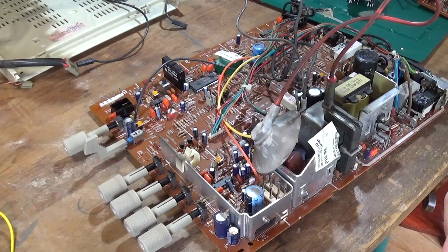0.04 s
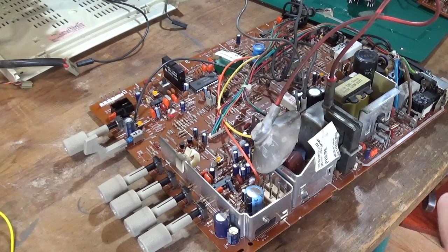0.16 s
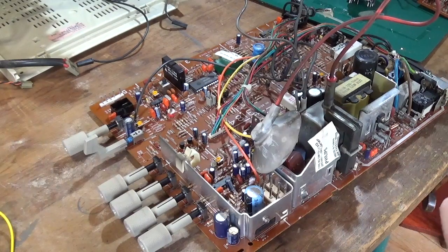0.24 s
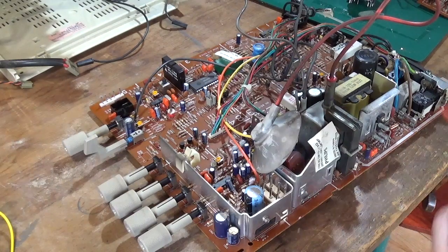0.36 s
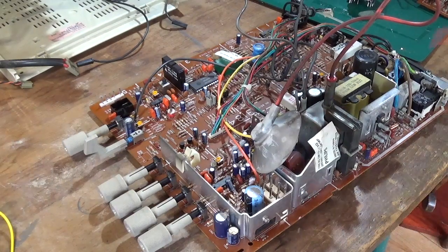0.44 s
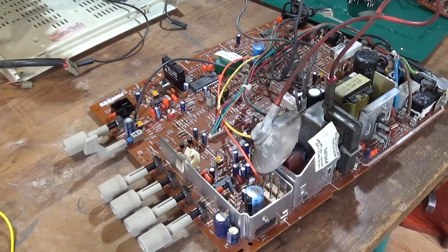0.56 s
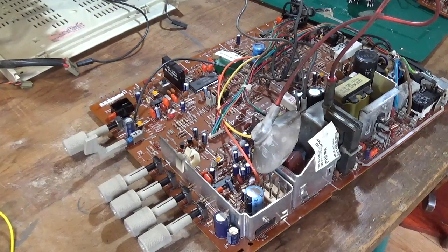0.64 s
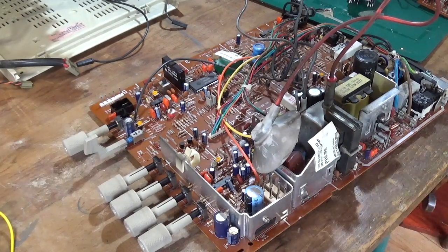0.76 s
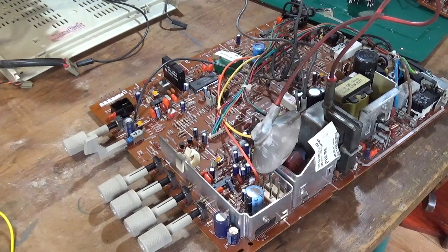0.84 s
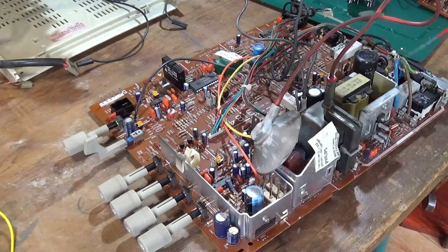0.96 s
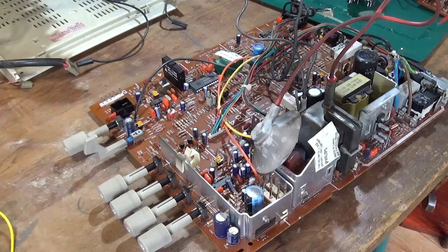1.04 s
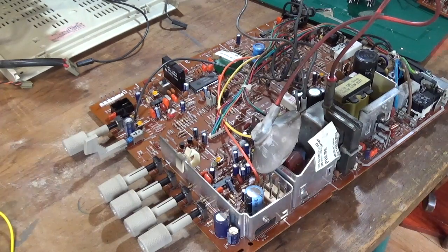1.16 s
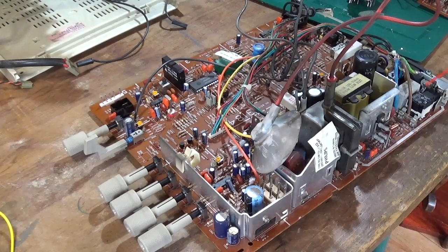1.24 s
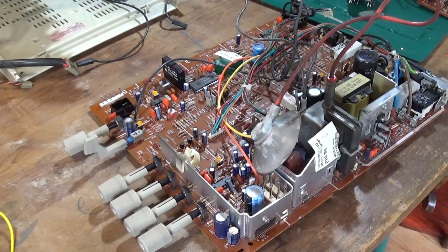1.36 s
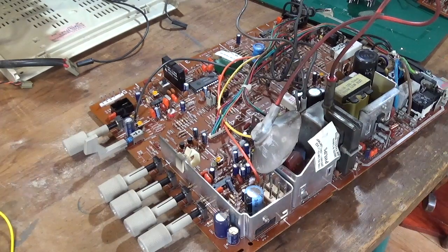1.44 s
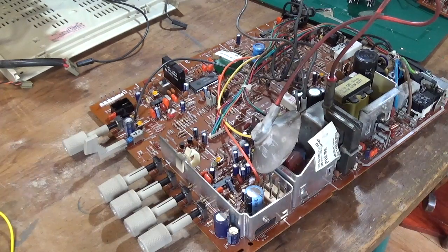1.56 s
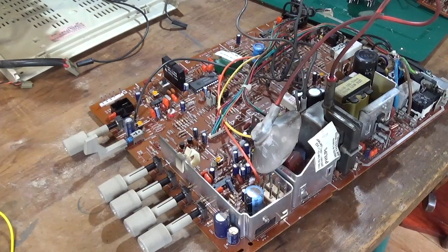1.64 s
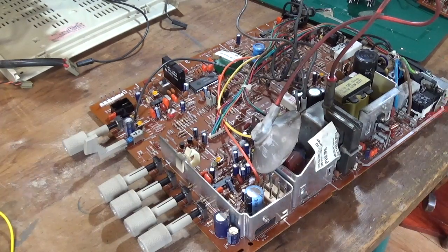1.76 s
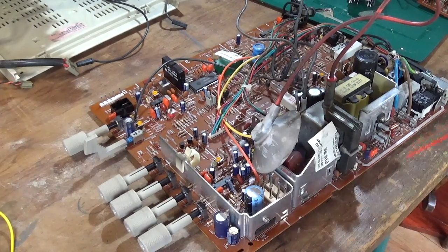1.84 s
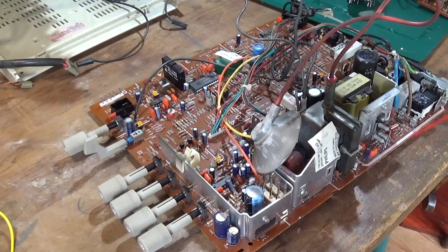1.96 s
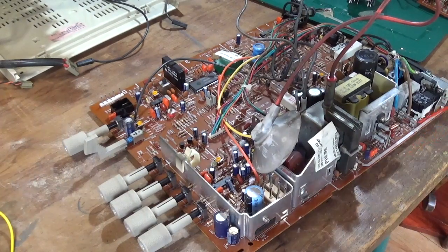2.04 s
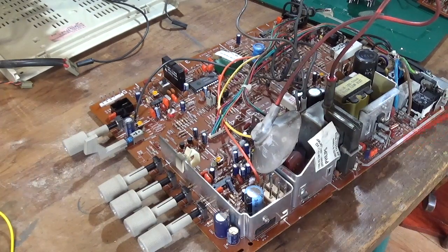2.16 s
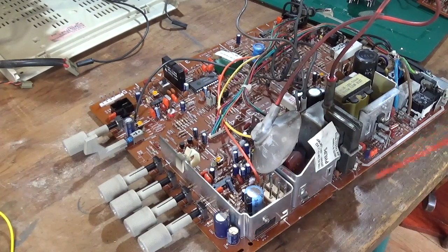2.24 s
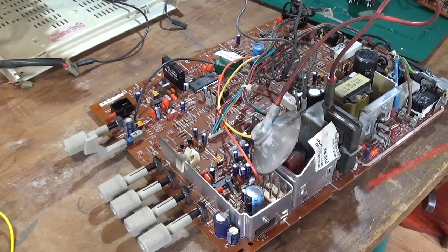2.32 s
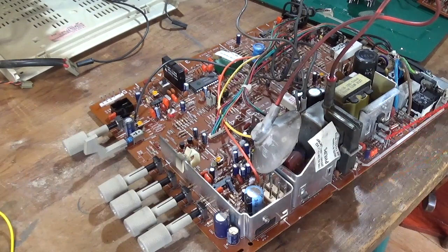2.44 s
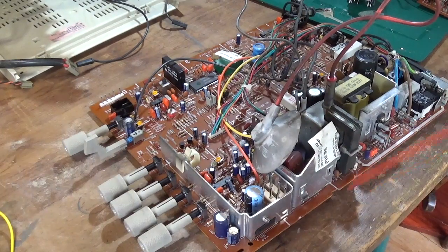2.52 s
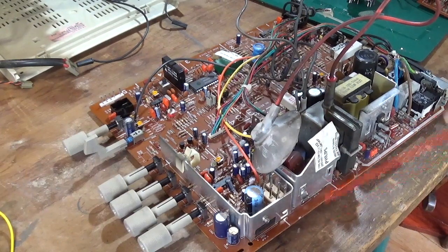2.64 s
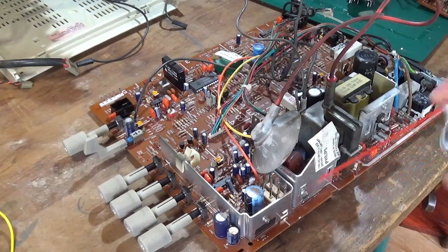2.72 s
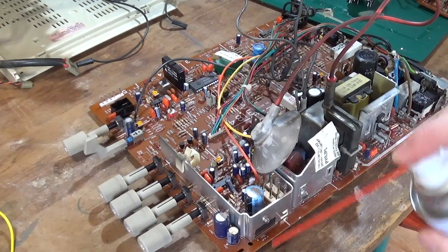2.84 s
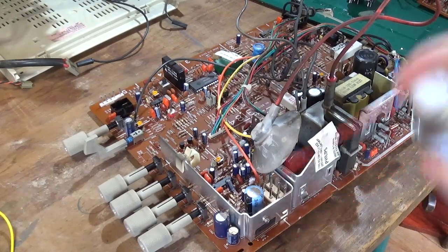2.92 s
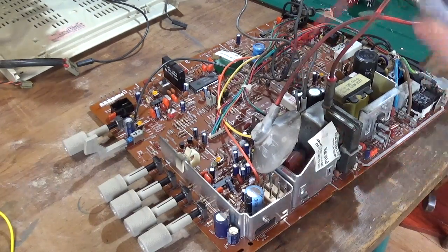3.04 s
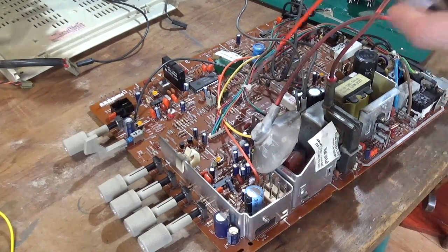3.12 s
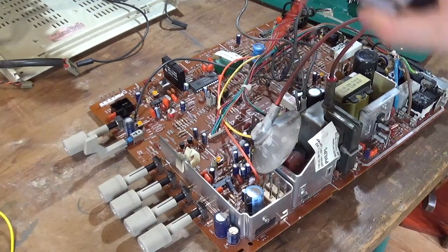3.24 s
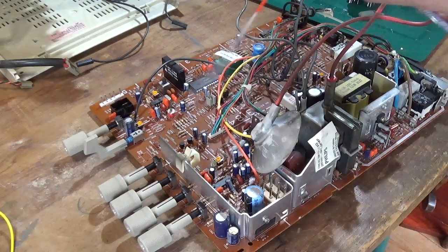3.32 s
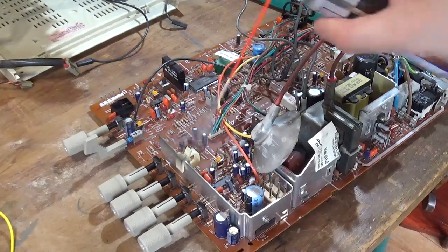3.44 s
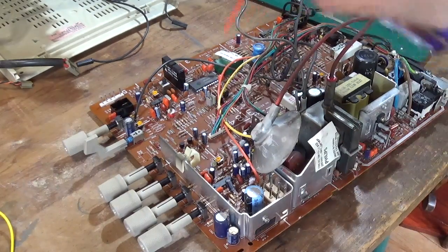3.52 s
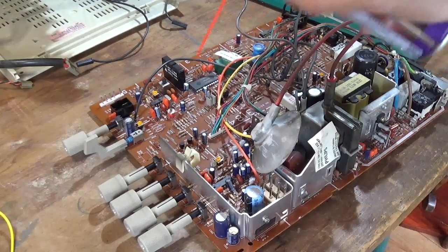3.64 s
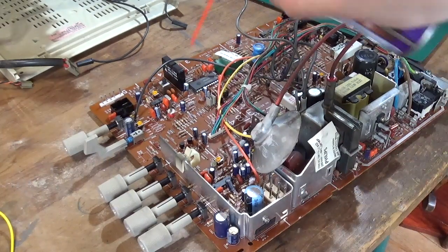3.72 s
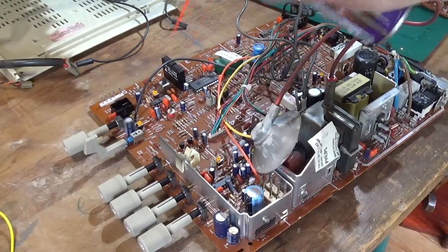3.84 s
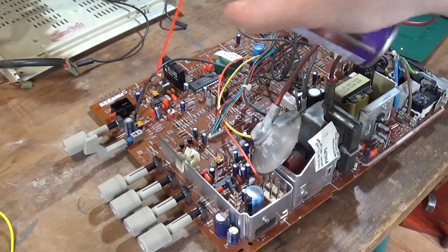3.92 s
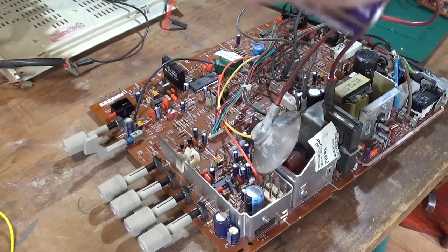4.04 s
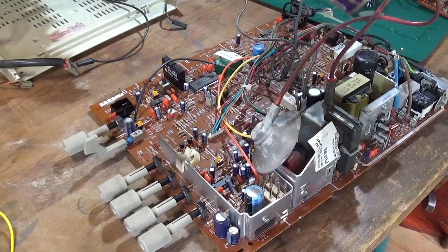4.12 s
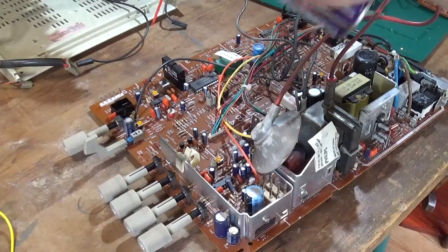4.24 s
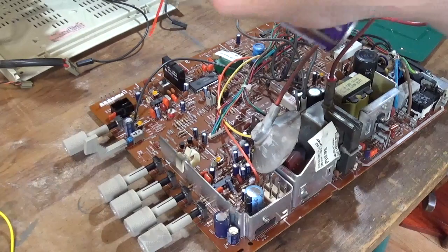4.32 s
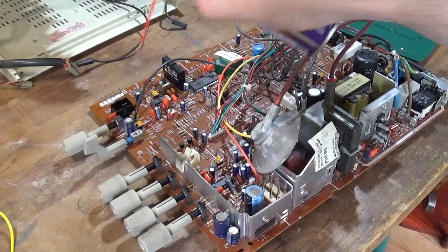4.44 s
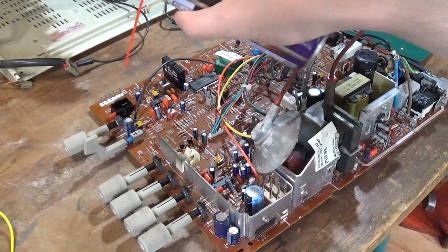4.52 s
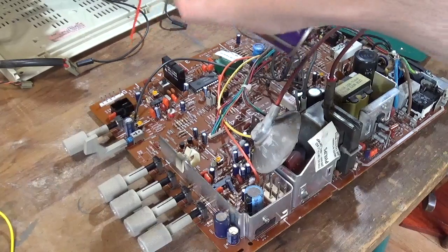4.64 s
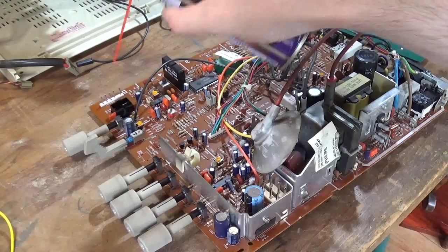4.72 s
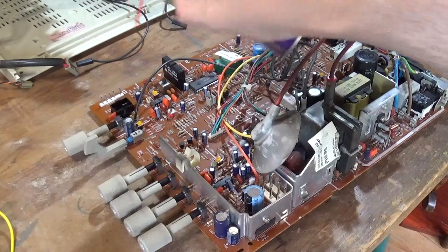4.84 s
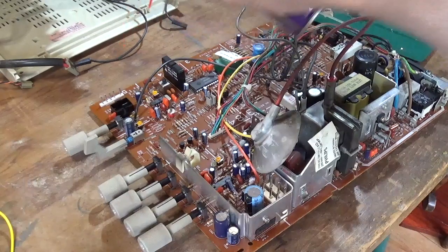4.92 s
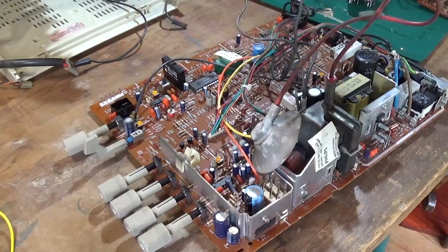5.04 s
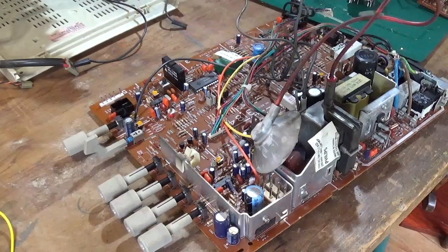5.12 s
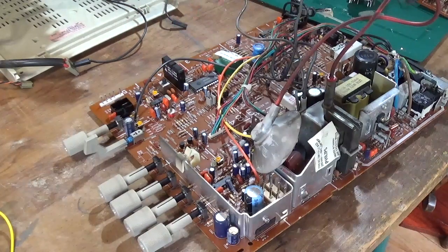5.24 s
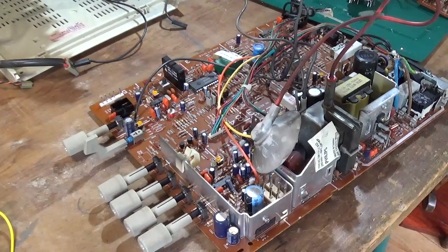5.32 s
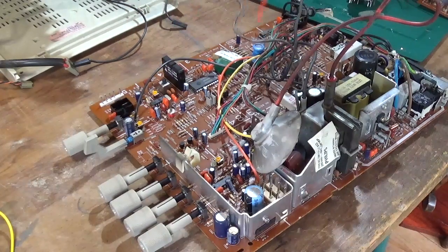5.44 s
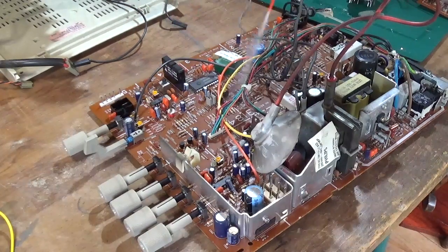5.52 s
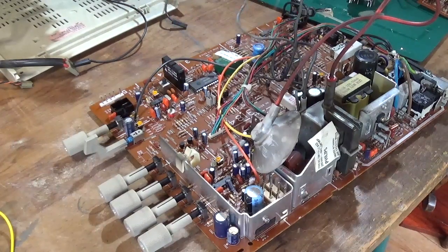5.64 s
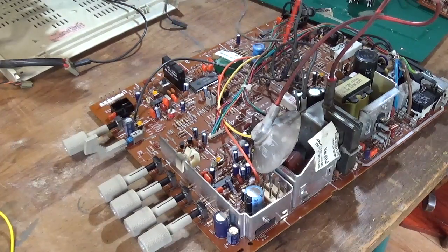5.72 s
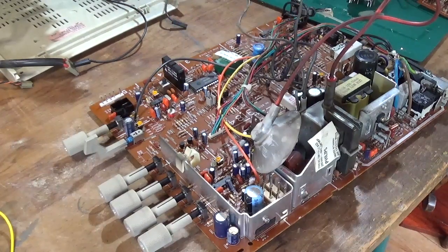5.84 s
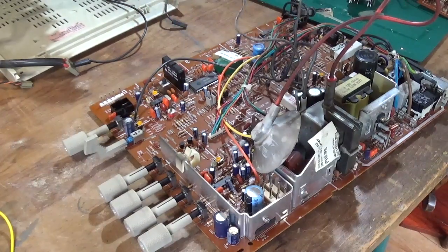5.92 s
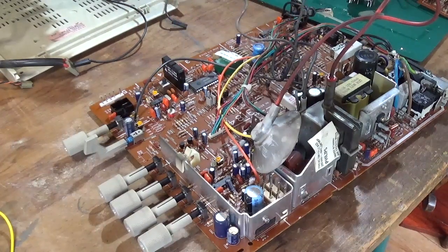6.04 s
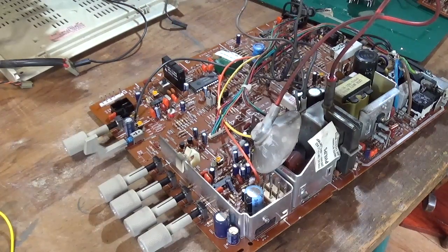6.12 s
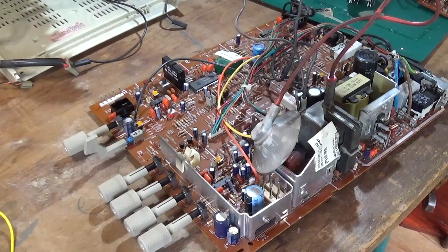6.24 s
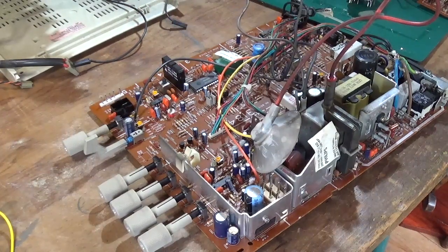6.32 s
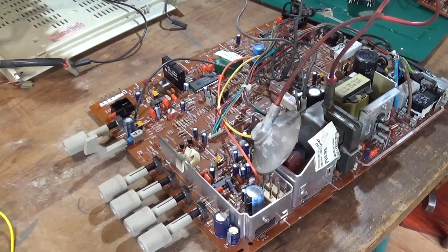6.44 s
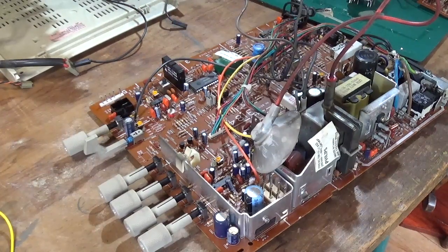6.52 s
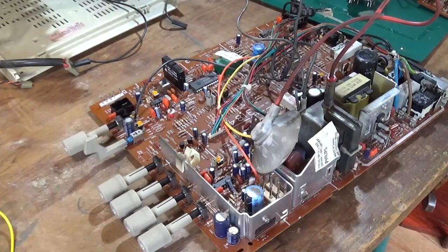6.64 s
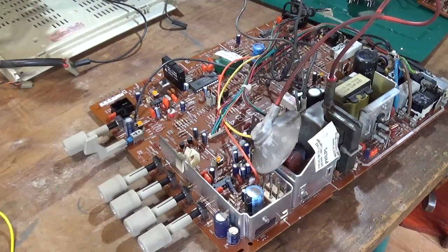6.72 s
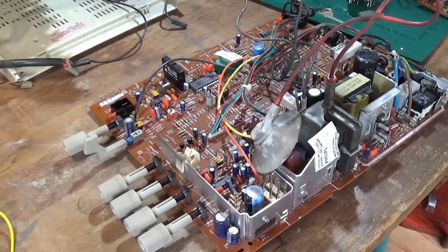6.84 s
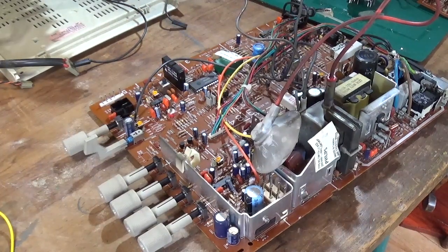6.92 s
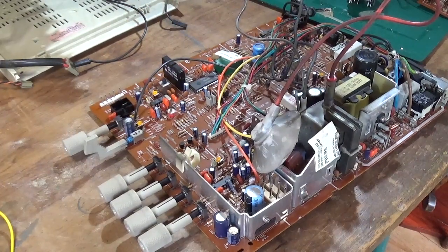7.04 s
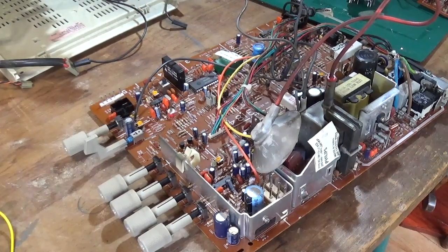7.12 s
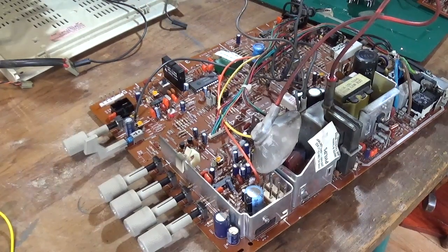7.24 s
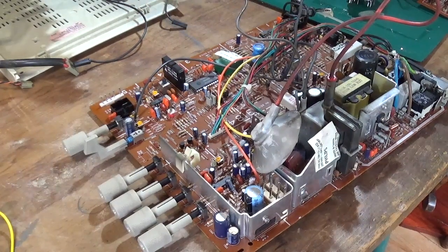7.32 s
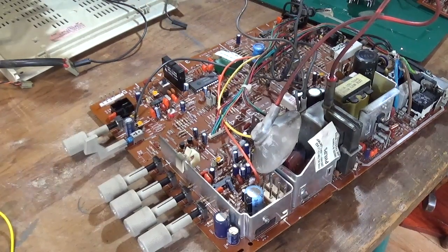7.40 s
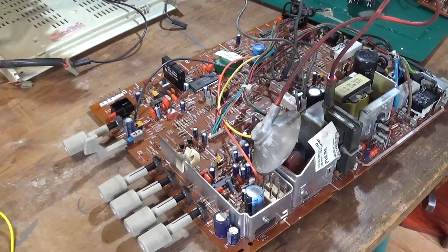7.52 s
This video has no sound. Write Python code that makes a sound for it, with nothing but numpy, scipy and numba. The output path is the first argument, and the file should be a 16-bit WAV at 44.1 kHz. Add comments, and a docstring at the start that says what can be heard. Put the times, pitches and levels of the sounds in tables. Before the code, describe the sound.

Close compressed-air spray hisses and roars over crowded electronic parts in six bursts, followed by sleeve rustle, dull taps and one last brief puff.

```python
"""A quiet room hums throughout; plastic trigger ticks come first, and a few more in later pauses.
Six short bursts of compressed air hit a circuit board: the free jet is high noise, the struck parts add
a lower roar with gap resonances, and edges add swells. Then a sleeve rustles (banded noise in strokes) and
soft knocks land on the bench (decaying modes), with faint squeaks and thin hiss; a seventh, brief burst
runs to the end. All is heard close by in stereo; bench and walls add short noise tails."""
import sys
import numpy as np
from scipy import signal
from scipy.fft import rfft, irfft, next_fast_len
from scipy.io import wavfile
from scipy.ndimage import uniform_filter1d
from numba import njit

SR = 44100
rng = np.random.default_rng(int(sys.argv[2]) if len(sys.argv) > 2 else 0)


def to_wav(sig):
    """Store sig (one row per channel, or 1-D mono) as 16-bit WAV at the path in sys.argv[1].

    Samples outside -1..1 are clipped; the rate is SR.
    """
    pcm = np.clip(np.atleast_2d(sig), -1, 1) * 32767
    pcm = np.round(pcm).astype(np.int16)
    wavfile.write(sys.argv[1], SR, pcm.T)  # frames by channels


N = 333837
TIME = np.arange(N) / SR
FFT_SIZE = next_fast_len(N)
HZ = np.maximum(np.fft.rfftfreq(FFT_SIZE, 1 / SR), 1)

# Left-right correlation of the near noise. Each row: frequency in Hz, correlation.
NEAR_LIKENESS = [(60, 0.33), (300, 0.9), (900, 0.93), (1900, 0.83), (2700, 0.92), (3600, 0.58),
                 (5500, 0.13), (6800, 0.58), (7600, 1), (9200, 0.81), (10300, 0.59), (15000, 0.66)]


def undb(db):
    """dB to gain."""
    return 10 ** (np.asarray(db) / 20)


def unit(x):
    """Scale to rms 1."""
    return x / np.sqrt(np.mean(x ** 2))


def on_hz(points):
    """Read a table of (Hz, value) on a log-frequency axis."""
    hz, value = np.transpose(points)
    return np.interp(np.log(HZ), np.log(hz), value)


def noise(likeness, colour=((1, 0), (2, 0))):
    """Stereo noise, rms 1, with a colour and a left-right correlation for each frequency."""
    corr = np.clip(on_hz(likeness), 0, 1)
    white = rfft(rng.standard_normal((2, FFT_SIZE)))
    mid, side = white * np.sqrt([1 + corr, 1 - corr]) * undb(on_hz(colour))
    return unit(irfft([mid + side, mid - side], FFT_SIZE)[:, :N])


@njit
def svf(x, g, k):
    """State-variable band-pass on each channel; centre and width may move every sample."""
    y = np.empty(x.shape)
    for c in range(x.shape[0]):
        b, l = 0., 0.
        for i in range(x.shape[1]):
            v = (b + g[i] * (x[c, i] - l)) / (1 + g[i] * (g[i] + k[i]))
            b, l, y[c, i] = 2 * v - b, l + 2 * g[i] * v, k[i] * v
    return y


def band(x, hz, pass_width_hz):
    """Band-pass run twice, rms 1; the width is that of one pass."""
    hz = np.clip(hz + np.zeros(N), 20, .45 * SR)
    g, k = np.tan(np.pi * hz / SR), pass_width_hz / hz
    return unit(svf(svf(x, g, k), g, k))


def walk(rate_hz):
    """Random levels held 1 / rate_hz and slewed twice, rms 1."""
    hold = int(SR / rate_hz)
    steps = np.repeat(rng.standard_normal(N // hold + 1), hold)
    return unit(uniform_filter1d(uniform_filter1d(steps, hold), hold)[:N])


def swell(s, db, fall_s, rise=1):
    """Bell-shaped gain, down to 1/e after fall_s; rise is the rising share of that time."""
    return undb(db) * np.exp(-((TIME - s) / np.where(TIME < s, rise * fall_s, fall_s)) ** 2)


def patchy(x, db, patch_hz, patch_s):
    """Patches of the spectrum swell and fade at random, alike left and right."""
    frame, hop = 512, 256
    spec = signal.stft(x, nperseg=frame)[2]
    field = rng.standard_normal(spec.shape[1:])
    for axis, cells in enumerate((patch_hz * frame / SR, patch_s * SR / hop)):
        field = uniform_filter1d(field, max(int(cells), 1), axis=axis)
    return signal.istft(spec * undb(db * unit(field)), nperseg=frame)[1][:, :N]


def strike(modes, crack_db, size, rough=.18):
    """A blow: decaying modes (Hz, dB, t60 s), detuned and phase-wavering each time, plus a noise crack."""
    t = np.arange(size) / SR
    chance = rng.standard_normal((len(modes) + 1, size))
    crack_t60_s = 0.091
    out = undb(crack_db) * chance[-1] * np.exp(-t * np.log(1000) / crack_t60_s)
    for (hz, db, t60_s), draw in zip(modes, chance):
        waver = rough * np.cumsum(draw)
        tone = np.sin(2 * np.pi * hz * (1 + .02 * draw[0]) * t + waver)
        out += undb(db) * tone * np.exp(-t * np.log(1000) / t60_s)
    return out


# Left-right correlation of the room. Each row: frequency in Hz, correlation.
ROOM_LIKENESS = [(25, 0.94), (60, 0.12), (150, 0.046), (600, 0.43), (3000, 0.12), (15000, 0.22)]
# Room air colour. Each row: frequency in Hz, relative density in dB per Hz.
ROOM_COLOUR = [(15, -39.5), (25, -16.5), (122, -7), (215, -16.5), (410, -17.5), (900, -24), (1300, -30),
               (2200, -36), (5000, -40.5), (12500, -42.5), (15500, -68)]
# Steady hum lines. Each row: centre in Hz, one-pass width in Hz, mean level in dB.
HUM_LINES = [(55.7, 10, -71.5), (176.9, 16, -68)]
# Level bumps of the 110 Hz noise band, most of them chance wavering. Each row: peak time in seconds,
# gain in dB, fall to 1/e in seconds.
BUMPS_110_HZ = [(0.135, -61, 0.041), (0.874, -50.5, 0.076), (2.63, -51, 0.04), (2.84, -55.5, 0.042),
                (3.88, -57, 0.051), (4.442, -53.5, 0.13), (7.398, -57, 0.055)]


def room():
    """Steady coloured air with wavering narrow-band hum, both stronger on the left."""
    air_db, rest_110_hz_db = -61, -66.5
    air = noise(ROOM_LIKENESS, ROOM_COLOUR) * undb(air_db + 0.71 * walk(3.2))
    hum = sum(undb(db + 1.5 * walk(2.7)) * band(noise(ROOM_LIKENESS), hz, width)
              for hz, width, db in HUM_LINES)
    gain = undb(rest_110_hz_db + 1.4 * walk(8)) + sum(swell(*row) for row in BUMPS_110_HZ)
    hum = hum + gain * band(noise(ROOM_LIKENESS), 110.0, 25)
    return air * undb([[1.5], [-1.5]]) + hum * undb([[2.5], [-2.5]])


# Thin hiss in some pauses. Each row: peak time in seconds, mean gain in dB, fall to 1/e in seconds.
SEEPS = [(2.144, -75, .04), (2.922, -73, 0.13), (4.985, -72.5, 0.062), (6.263, -68, .03),
         (7.272, -63, 0.046), (7.38, -68, .06), (7.47, -67, .04)]


def seep(hiss):
    """Thin hiss near 5 kHz, swelling with a flickering level."""
    return sum(swell(*row) for row in SEEPS) * undb(2.5 * walk(40)) * hiss


# Faint squeaks. Each row: peak time in seconds, level in dB, fall to 1/e in seconds, centre in Hz.
SQUEAKS = [(4.081, -73.5, 0.087, 1307), (6.069, -75.5, .06, 1380), (6.225, -67, 0.032, 1384),
           (7.05, -66, .02, 1520), (6.83, -68, 0.038, 1590), (7.4, -72, .07, 1550)]


def squeak():
    """Thin tones: narrow noise bands under bell-shaped gains."""
    return sum(swell(s, db, fall_s) * band(noise(NEAR_LIKENESS), hz, 70)
               for s, db, fall_s, hz in SQUEAKS)


# Plastic modes of trigger and straw. Each row: nominal frequency in Hz, t60 in seconds.
PLASTIC = [(1150, 0.056), (1600, 0.07), (2150, 0.039), (2870, 0.08), (4150, 0.09), (5150, .05), (7000, .04)]
# Trigger and straw ticks. Each row: start in seconds, level in dB, mode favoured by the spot struck in Hz,
# broad crack against the ring in dB.
TICKS = [(0.3794, -65, 4110, -12), (0.3874, -69, 3020, -8), (0.455, -51.5, 1570, -8),
         (2.1001, -63, 4990, -15.5), (2.1294, -64, 5250, -8), (5.018, -53, 2870, -12.5),
         (6.025, -60, 1150, -7), (6.244, -56, 5600, -14), (6.2861, -57, 5200, -8)]


def ticks():
    """Plastic blows; modes weaken by 24 dB an octave away from the one favoured by the spot struck."""
    out = np.zeros(N + 6000)
    for s, db, aim_hz, crack_db in TICKS:
        modes = [(hz, -24 * abs(np.log2(hz / aim_hz)), t60_s) for hz, t60_s in PLASTIC]
        out[int(s * SR):][:6000] += undb(db) * strike(modes, crack_db, size=6000)
    return out[:N]


# Bench top modes. Each row: nominal frequency in Hz, level in dB before hardness, t60 in seconds.
BENCH = [(193.5, -2, .055), (490, -6, 0.037), (880, -9.5, 0.027), (1250, -23, .02)]
# Soft bench knocks. Each row: start in seconds, level in dB, hardness as lift of upper modes in dB an octave.
KNOCKS = [(6.441, -45.5, 1.5), (6.688, -49.5, 4), (7.112, -49.5, 5.5), (7.1767, -43, 0.5),
          (7.211, -46.5, 3.5), (7.229, -46, -1), (7.244, -46, 2), (7.36, -47, -5), (7.37, -47, -5),
          (7.404, -56, 0), (7.417, -53, -5), (7.426, -51, -4)]


def knocks():
    """Blows on the bench modes, tilted by hardness and dulled by a low-pass."""
    out = np.zeros(N + 6000)
    soft = signal.butter(2, 1300, fs=SR, output="sos")
    for s, db, hard_db in KNOCKS:
        modes = [(hz, mode_db + hard_db * np.log2(hz / BENCH[0][0]), t60_s) for hz, mode_db, t60_s in BENCH]
        blow = signal.sosfilt(soft, strike(modes, -19, size=6000, rough=0.04))
        out[int(s * SR):][:6000] += undb(db) * blow
    return out[:N]


SLEEVE_START_S, SLEEVE_STOP_S, SLEEVE_FADE_S, SLEEVE_DB = 5.85, 7.5, 0.48, -70
STROKE_RISE = 0.65  # share of the fall
# Sleeve strokes. Each row: peak time in seconds, treble gain in dB, fall to 1/e in seconds,
# part below 4 kHz against the treble in dB.
STROKES = [(6.147, -74, 0.022, -4), (6.25, -73, 0.024, -4), (6.33, -64.5, .03, -14),
           (6.397, -59.5, .04, -6), (6.44, -65, 0.027, 1), (6.533, -63, 0.038, -17),
           (6.645, -56.5, 0.038, -7), (6.76, -58.5, 0.043, -14), (6.827, -66, .02, -5),
           (6.857, -58.5, .03, -5), (6.92, -65, 0.039, -16), (6.974, -61.5, .03, -14),
           (7.064, -56, 0.041, -5), (7.168, -64, 0.052, -10), (7.29, -67, .04, -4), (7.488, -72, 0.033, 0)]


def sleeve():
    """Gains of the cloth rustle, treble and middle: strokes over a faint drag that creeps in."""
    fade = np.clip((TIME - SLEEVE_START_S) / SLEEVE_FADE_S, 0, 1)
    drag = undb(SLEEVE_DB) * fade * (TIME < SLEEVE_STOP_S)
    treble = drag + sum(swell(s, db, fall_s, STROKE_RISE) for s, db, fall_s, _ in STROKES)
    middle = drag + sum(swell(s, db + mid_db, fall_s, STROKE_RISE) for s, db, fall_s, mid_db in STROKES)
    return treble, middle


def contacts():
    """Sixty tiny one-mode blows at random times, scaled by the sleeve's treble gain."""
    out = np.zeros(N + 6000)
    cloth_gain = sleeve()[0]
    for when, pitch, size in rng.random((60, 3)):
        at = int((SLEEVE_START_S + when * (SLEEVE_STOP_S - SLEEVE_START_S)) * SR)
        gain = cloth_gain[min(at, N - 1)] * undb(5.5 - 8 * size)
        out[at:][:2000] += gain * strike([(600 * 10 ** pitch, 0, .03)], -7, size=2000)
    return out[:N]


# Hollows of the metal frame and bench. Each row: centre in Hz, width in Hz, lift in dB (negative cuts).
HOLLOWS = [(613, 43, 3.5), (1286, 98, 2.5), (1800, 36, 1.5), (2430, 140, 2), (2790, 45, 3), (3386, 140, 2),
           (4830, 130, -1), (5600, 100, 1.5), (7900, 600, 0.5)]


def hollows(x):
    """Resonances in series, each lifting or cutting a narrow band of what passes."""
    for hz, width, db in HOLLOWS:
        x = x + (undb(db) - 1) * signal.lfilter(*signal.iirpeak(hz, hz / width, SR), x)
    return x


def cloth(hiss):
    """Rustle as dense grains of banded noise, with a low rub around each knock."""
    rub_db, rub_fall_s = -18, .03  # dB against the knock
    treble, middle = sleeve()
    low = sum(swell(s, db + rub_db, rub_fall_s, rise=.4) for s, db, _ in KNOCKS)
    layers = treble * (band(noise(ROOM_LIKENESS), 7700, 16200) + undb(-10) * hiss)
    layers = layers + middle * band(noise(ROOM_LIKENESS), 1350, 4700)
    layers = layers + low * band(noise(ROOM_LIKENESS), 390, 810)
    grains_db = 0.83 * walk(190)
    balance_db = np.array([[1.2], [-1.2]])
    return patchy(hollows(layers), 2.3, patch_hz=1500, patch_s=.03) * undb(grains_db + balance_db)


def handling():
    """Ticks, knocks, contacts, cloth, squeak and seep; cloth and seep share one hiss."""
    hiss = band(noise(ROOM_LIKENESS), 5050, 1200)
    return ticks() + knocks() + contacts() + cloth(hiss) + squeak() + seep(hiss)


# Trigger presses. Each row: valve opens in seconds, unseating time in seconds, first crack against full flow
# in dB, time to full flow in seconds, lets go in seconds, base buffeting in dB, buffeting centre in Hz,
# mean board rumble in dB, left minus right in dB.
BURSTS = [(0.591, 0.0078, -6, 0.083, 1.316, -40, 733, -53.5, -.5),
          (1.36, 0.045, -21, 0.063, 1.939, -39.5, 853, -60.5, -0.2),
          (2.176, 0.0048, -26.5, 0.069, 2.84, -38.5, 876, -54, -.5),
          (3.058, .007, -11, 0.073, 3.967, -43.5, 678, -54, -0.8),
          (4.221, 0.023, -13, .035, 4.9, -44, 710, -54.5, -1.1),
          (5.151, 0.0099, -13, 0.042, 5.91, -43.5, 788, -58, -.9),
          (7.497, 0.0074, -11.5, 0.054, 7.57, -46, 760, -57.5, -.6)]


def valve():
    """Flow gain (crack, push up to full, hold, quick fall) and the index of the latest press."""
    shut_db_per_s = 517
    push_curve = 0.77  # under 1: the finger lingers, then pushes through
    gain = np.zeros(N)
    for opens, unseat, crack_db, full, shuts, *_ in BURSTS:
        push_db = crack_db * np.clip(1 - (TIME - opens) / full, 0, 1) ** push_curve
        fall_db = shut_db_per_s * np.clip(TIME - shuts, 0, 1)
        gain += undb(push_db - fall_db) * np.clip((TIME - opens) / unseat, 0, 1)
    press = np.maximum(np.searchsorted(np.transpose(BURSTS)[0], TIME) - 1, 0)
    return gain, press


# Free jet colour. Each row: frequency in Hz, relative density in dB per Hz.
JET_COLOUR = [(300, -28), (1000, -25), (3000, -7), (5000, 0), (8000, -4), (11000, -1), (15500, -2.5)]


def free_jet(top_db, body_db):
    """Turbulent hiss split at 9 kHz, with a shared flicker, and a further one on the top."""
    air = noise(NEAR_LIKENESS, JET_COLOUR)
    top = signal.sosfilt(signal.butter(4, 9000, "high", fs=SR, output="sos"), air)
    body = signal.sosfilt(signal.butter(4, 9000, fs=SR, output="sos"), air)
    flicker = undb(0.59 * walk(40))
    return flicker * (undb(body_db) * unit(body) + undb(top_db + .8 * walk(40)) * unit(top))


def parts_roar(roar_db, gap_hz):
    """Eddies shed on the parts: a broad roar with a narrow ring of the gap below the straw."""
    broad = band(noise(NEAR_LIKENESS), gap_hz, 1.55 * gap_hz)
    ring = band(noise(NEAR_LIKENESS), gap_hz * (1 + .05 * walk(15)), 0.042 * gap_hz)
    return undb(roar_db + 0.52 * walk(35)) * unit(broad + undb(-14.5) * ring)


def buffeting(low_db, low_hz):
    """Low, wide-band eddy noise with an unsteady level."""
    return undb(low_db + 1.7 * walk(30)) * band(noise(NEAR_LIKENESS), low_hz, 1.71 * low_hz)


def board_rumble(rumble_db):
    """The board's low noise near 220 Hz, with an unsteady level."""
    return undb(rumble_db + 3.2 * walk(15)) * band(noise(NEAR_LIKENESS), 220, 310)


# Jet sweeps over an edge. Each row: peak time in seconds, gain in dB, nominal centre in Hz,
# fall to 1/e in seconds.
SWEEPS = [(0.76, -42, 1500, .025), (.975, -32.5, 1280, 0.027), (1.171, -26, 1960, 0.017),
          (1.271, -27, 2360, 0.017), (1.454, -26.5, 2660, 0.024), (2.254, -30, 2300, 0.019),
          (2.469, -19.5, 2250, 0.0058), (2.509, -19, 1830, 0.0077), (2.72, -30, 2600, 0.01),
          (3.371, -33, 803, 0.038), (3.661, -37, 888, 0.023), (4.293, -33.5, 860, 0.015),
          (4.47, -32.5, 1000, 0.021), (4.543, -32.5, 910, 0.021), (4.76, -44, 2490, 0.022),
          (5.508, -35, 1008, 0.03)]


def edge_sweeps():
    """A bell-shaped swell of banded noise as the jet crosses each edge."""
    edges, gusts = np.zeros((2, N)), noise(NEAR_LIKENESS)
    for s, db, hz, fall_s in SWEEPS:
        near = slice(int((s - 3 * fall_s) * SR), int((s + 3 * fall_s) * SR))
        sos = signal.butter(2, [hz / 1.93, hz * 1.45], "band", fs=SR, output="sos")
        edge = signal.sosfilt(sos, gusts[:, near])
        edges[:, near] += unit(edge) * swell(s, db, fall_s)[near]
    return edges


BUFFET_PER_ROAR = 0.27  # dB per dB of roar above the press mean
BUFFET_DB_PER_OCTAVE, GAP_REFERENCE_HZ = -6, 1884  # stronger in wide, low-ringing gaps
# What the straw points at, one table a press. Each row: time in seconds, upper treble of the free jet in dB,
# hiss off the parts in dB, roar on the parts in dB, gap resonance in Hz.
AIM = [
    [(0.64, -35, -36.5, -42.5, 1562), (0.696, -36.5, -39.5, -45, 2017), (0.74, -31.5, -38, -37.5, 1570),
     (0.786, -35, -36, -45.5, 1933), (0.892, -33.5, -36.5, -51, 1770), (0.978, -34, -35, -33.5, 1668),
     (1.084, -35.5, -34.5, -40, 1640), (1.146, -35, -39.5, -37, 1880), (1.182, -32, -22, -17, 2260),
     (1.202, -31, -22.5, -27, 2283), (1.264, -33, -29, -25, 2170), (1.31, -34, -36.5, -34.5, 2310)],
    [(1.44, -30.5, -36, -29, 2154), (1.47, -26.5, -40, -25, 2282), (1.506, -28, -29, -30, 2090),
     (1.544, -31, -34.5, -30, 2123), (1.574, -33, -29, -32.5, 1860), (1.626, -29, -31, -27, 2190),
     (1.644, -26.5, -26, -30, 1976), (1.722, -30.5, -33, -29, 1926), (1.8, -25.5, -32.5, -29, 2043),
     (1.866, -26.5, -33, -32.5, 1965), (1.912, -30, -30, -28.5, 1770), (1.94, -40, -30.5, -32, 1850)],
    [(2.25, -28, -34.5, -33, 2200), (2.298, -31, -37, -33, 1830), (2.35, -32, -37.5, -28, 2250),
     (2.434, -30.5, -32.5, -27, 1898), (2.468, -27, -36, -22, 2410), (2.524, -32, -36, -28.5, 1830),
     (2.566, -24.5, -31, -39, 2230), (2.672, -28.5, -29.5, -30.5, 1963), (2.728, -31.5, -25, -19.5, 2265),
     (2.786, -31.5, -35.5, -36.5, 2130), (2.826, -25.5, -32, -50, 2424), (2.84, -37.5, -41, -61, 2430)],
    [(3.12, -33, -33, -45, 1710), (3.148, -34, -34.5, -42, 1680), (3.3, -34.5, -38, -46, 1953),
     (3.364, -39, -35, -37, 1360), (3.454, -34.5, -29, -36, 2020), (3.494, -33.5, -37, -46, 1940),
     (3.602, -34, -36.5, -47, 2300), (3.682, -33.5, -35.5, -38, 1620), (3.71, -33, -31.5, -48, 1940),
     (3.768, -34, -38, -46.5, 2190), (3.944, -28.5, -32, -38, 1894), (3.96, -33.5, -32, -39.5, 1930)],
    [(4.26, -30.5, -35.5, -43, 2020), (4.298, -36.5, -34, -37, 1810), (4.354, -34.5, -39, -44, 2260),
     (4.484, -36, -31.5, -35, 2210), (4.51, -35, -34.5, -38, 2150), (4.542, -37, -30, -33, 2060),
     (4.592, -35, -36, -40.5, 2190), (4.624, -33.5, -38.5, -43, 1770), (4.72, -33, -34, -38, 2410),
     (4.764, -35.5, -31, -36.5, 2094), (4.834, -31, -34.5, -45, 2417), (4.9, -36, -36.5, -50, 2273)],
    [(5.2, -39, -38.5, -46, 2226), (5.208, -35.5, -36, -43, 2284), (5.296, -37.5, -39.5, -57, 1830),
     (5.436, -36, -33.5, -34.5, 1886), (5.472, -39, -40, -46, 1550), (5.51, -31.5, -32, -37, 1370),
     (5.556, -40, -34.5, -37, 1710), (5.596, -35.5, -36.5, -48, 1480), (5.722, -36, -35, -34.5, 1757),
     (5.782, -33, -30.5, -47, 1740), (5.844, -35, -34.5, -34.5, 1680), (5.89, -39.5, -39, -54.5, 1890)],
    [(7.54, -41, -38.5, -48, 1686), (7.554, -38, -38, -44, 1620), (7.57, -41, -44, -42, 1574)],
]


def spray():
    """Jet, roar, buffeting and rumble gated by the valve, plus edges; the crowded board scatters them."""
    flow, press = valve()
    *_, low_db, low_hz, rumble_db, pan_db = np.array(BURSTS)[press].T
    aim_s, *aim = np.vstack(AIM).T
    top_db, body_db, roar_db, gap_hz = (np.interp(TIME, aim_s, column) for column in aim)
    mean_roar_db = np.array([np.mean(rows, axis=0)[-2] for rows in AIM])[press]
    low_db = low_db + BUFFET_PER_ROAR * (roar_db - mean_roar_db)
    low_db = low_db + BUFFET_DB_PER_OCTAVE * np.log2(gap_hz / GAP_REFERENCE_HZ)
    blown = free_jet(top_db, body_db) + parts_roar(roar_db, gap_hz)
    blown = blown + buffeting(low_db, low_hz) + board_rumble(rumble_db)
    scattered = patchy(blown * flow + edge_sweeps(), 2.04, patch_hz=260.8, patch_s=.04)
    return hollows(scattered) * undb(np.array([pan_db, -pan_db]) / 2)


def tail(t60_s, top_hz):
    """Low-passed fading noise of unit energy a side, from 4 ms to 0.5 s."""
    t = TIME[:SR // 2]
    fade = rng.standard_normal((2, len(t))) * np.exp(-t * np.log(1000) / t60_s) * (t > .004)
    fade = signal.sosfilt(signal.butter(1, min(top_hz, .45 * SR), fs=SR, output="sos"), fade)
    return fade / np.sqrt(np.sum(fade ** 2, axis=1, keepdims=True))


def scene():
    """Near sounds with a quick tail off the bench and a duller one off the walls, over the room."""
    bench_db, bench_t60_s = -17, 0.18
    walls_db, walls_t60_s, walls_top_hz = -33, 0.32, 2500
    near = spray() + handling()
    space = undb(bench_db) * tail(bench_t60_s, 21000) + undb(walls_db) * tail(walls_t60_s, walls_top_hz)
    return near + signal.fftconvolve(near, space, axes=1)[:, :N] + room()


def record(dry):
    """A steep low-pass near 15.5 kHz."""
    top_hz = 15550
    return signal.sosfilt(signal.ellip(10, .2, 75, top_hz, fs=SR, output="sos"), dry)


dry = scene()
out = record(dry)
to_wav(out)
```